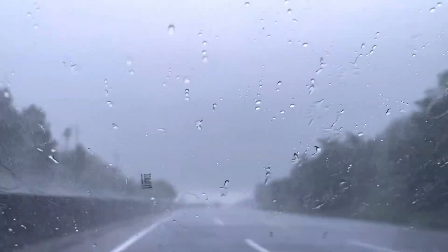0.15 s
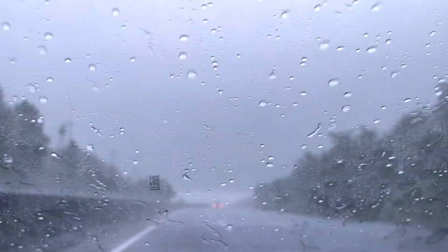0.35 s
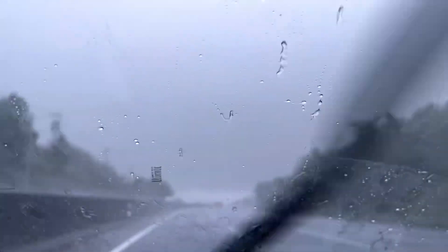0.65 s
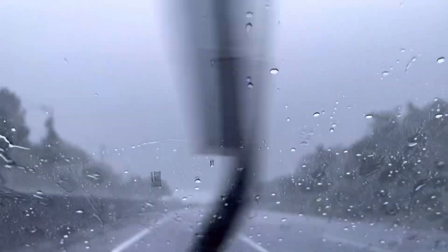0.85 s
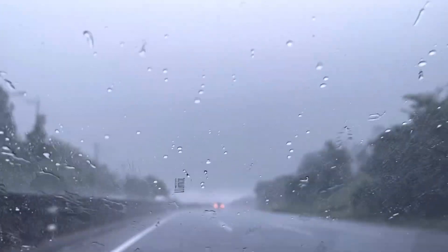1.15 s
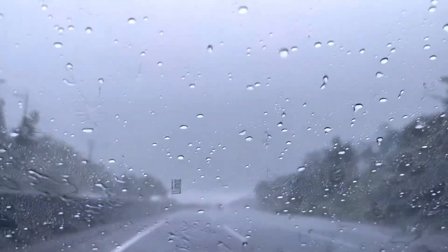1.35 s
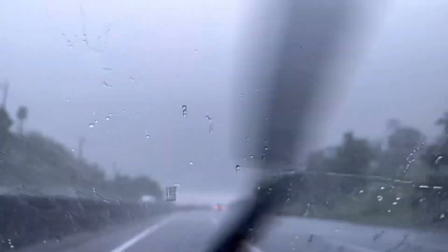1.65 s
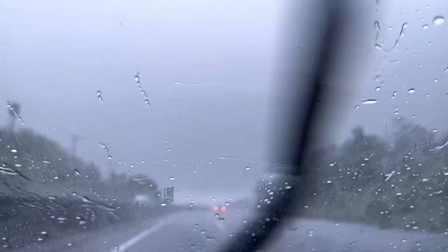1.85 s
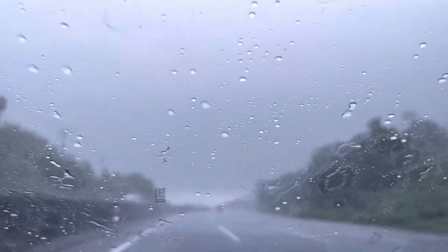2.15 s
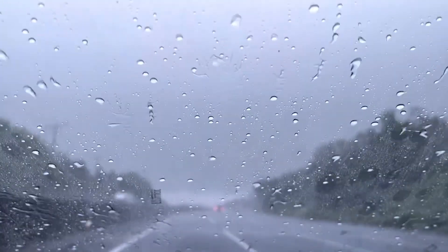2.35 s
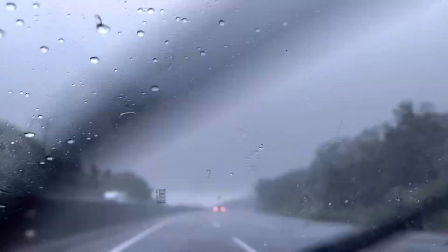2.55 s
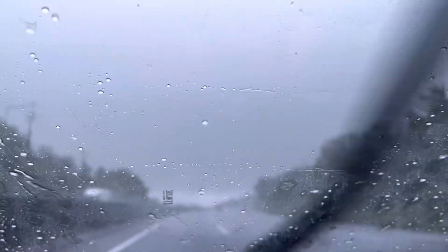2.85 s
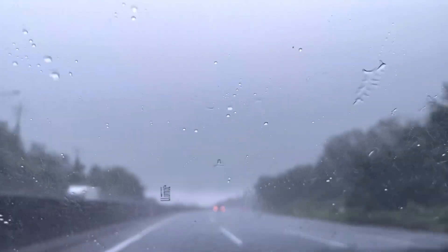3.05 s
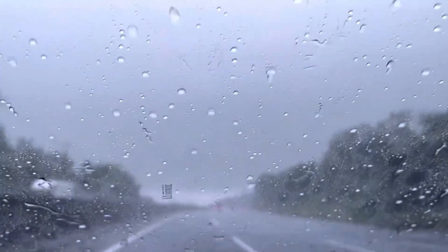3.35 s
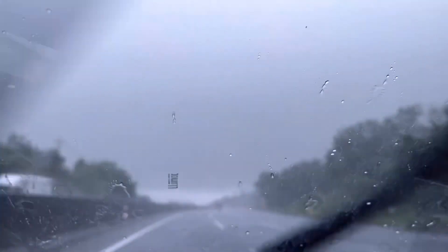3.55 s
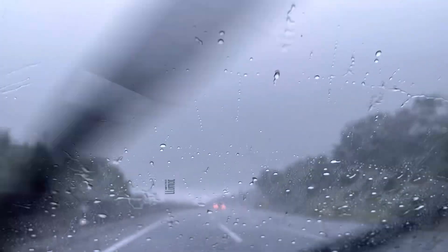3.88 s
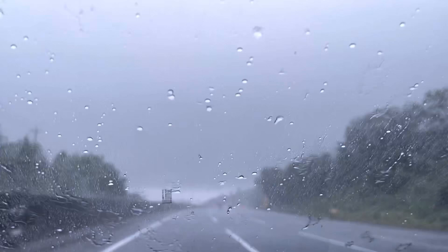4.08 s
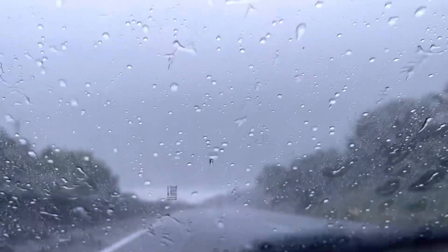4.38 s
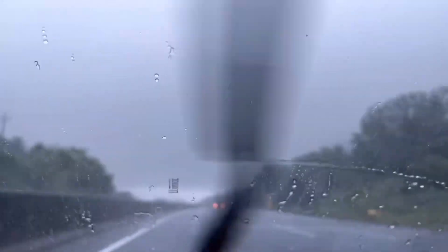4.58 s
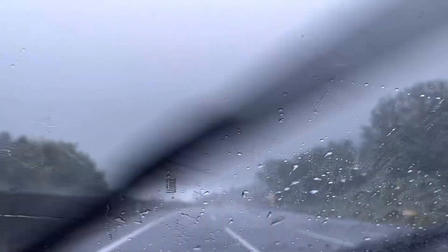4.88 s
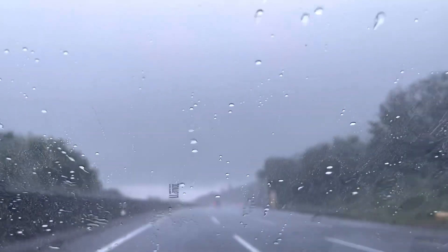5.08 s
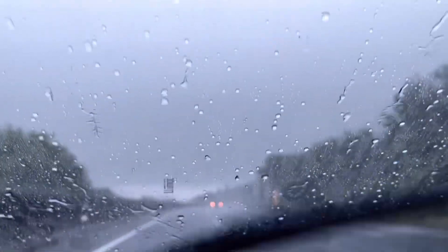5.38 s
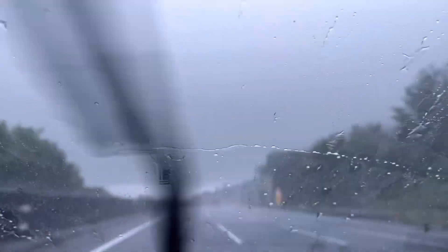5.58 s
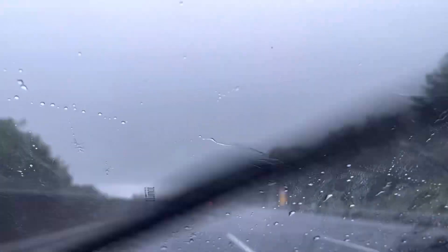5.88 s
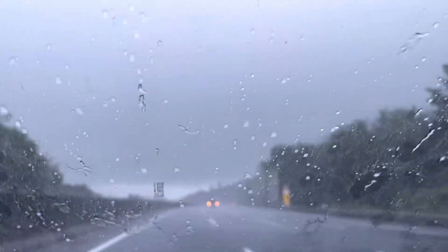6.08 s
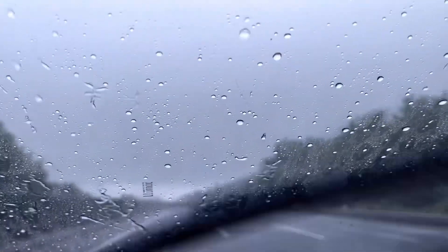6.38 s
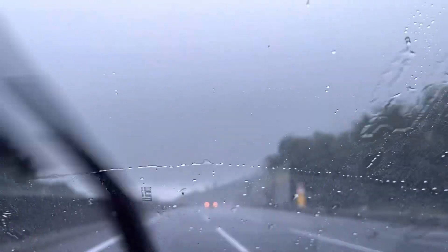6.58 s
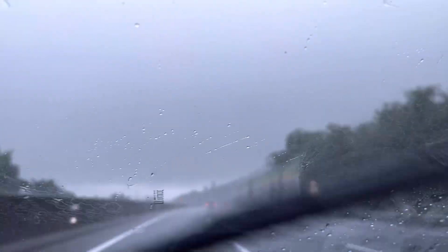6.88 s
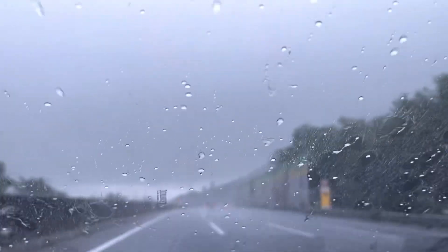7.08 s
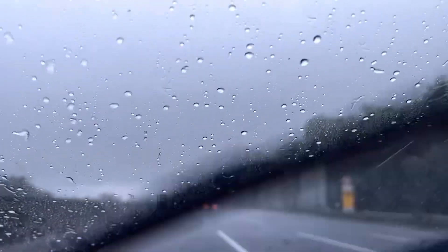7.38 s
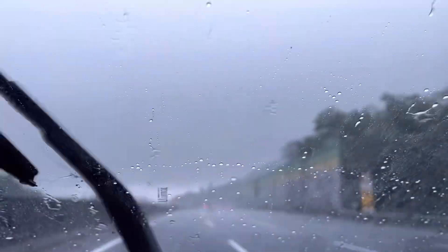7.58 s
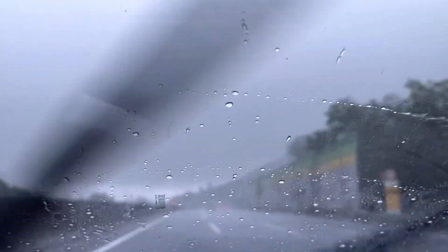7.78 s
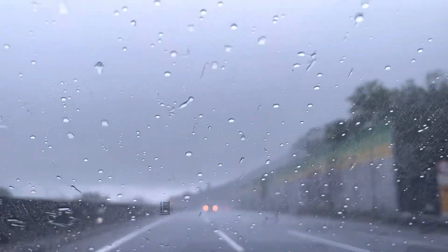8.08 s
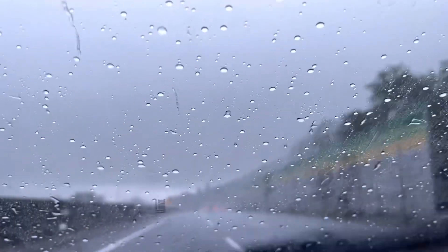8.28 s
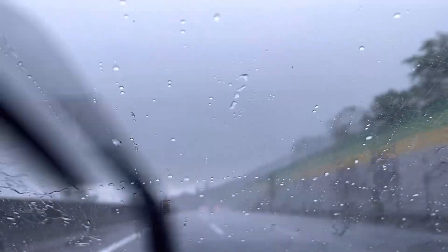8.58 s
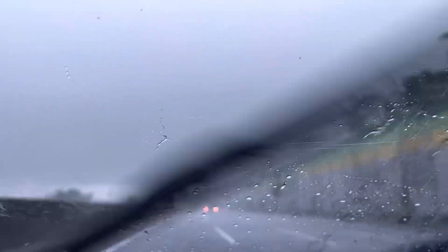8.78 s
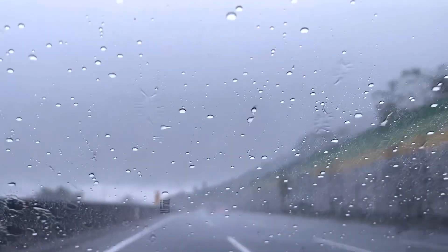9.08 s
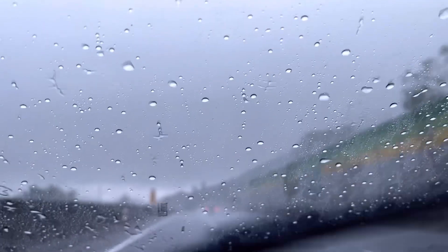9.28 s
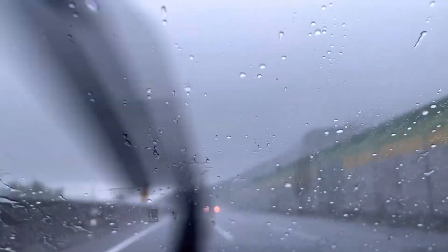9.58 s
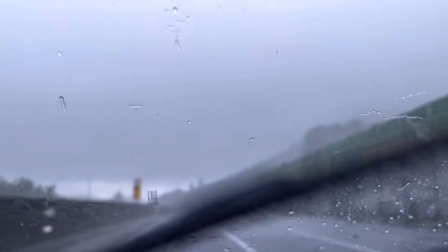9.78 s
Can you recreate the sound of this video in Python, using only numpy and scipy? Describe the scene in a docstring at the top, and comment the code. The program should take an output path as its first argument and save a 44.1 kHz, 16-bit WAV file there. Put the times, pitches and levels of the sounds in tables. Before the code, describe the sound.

For about ten seconds we are inside a car on a wet motorway in heavy rain. From the first instant dense drops crackle on the windscreen, bright and grainy, with fine hissy spray ticks and a softer, duller drumming on the lined roof. The rain swells and dips irregularly several times a second, fullest until about 6 s, then somewhat lighter. Separate fat drops slap sharply, clustered around 3.3-3.8, 5.1-5.7 and 6.2-7.1 s. Wipers reverse at about 0.8, 1.8, 2.8, 3.7, 4.7, 5.7, 6.7, 7.6, 8.6 and 9.6 s, each a short, woody low double thud, the last two firmer. Underneath, a deep road boom wavers with a faint low engine hum; a rough patch drums the floor from 0.5 to 0.9 s. Close stereo cabin microphones, short diffuse reflections, no fade at the end.

```python
"""Heavy rain on the roof and windscreen of a car on a wet motorway, heard by a two-port camera inside.
Drops are random impulses, coloured by glass or lined roof and smeared by all-pass echoes round the cabin.
The wipers knock at the end of each sweep, as decaying modes struck by two blades.
The road is shaped noise booming in the body, with a rough patch and an unsteady engine hum beneath."""
import sys
import numpy as np
from scipy import signal
from scipy.fft import rfft, irfft, next_fast_len
from scipy.io import wavfile
from scipy.ndimage import uniform_filter1d

SR = 44100
rng = np.random.default_rng(int(sys.argv[2]) if len(sys.argv) > 2 else 0)


def persist_wave(psi):
    """Save psi, clipped to +-1, as 16-bit WAV."""
    counts = np.round(np.clip(psi, -1, 1) * 32767).astype(np.int16)
    wavfile.write(sys.argv[1], SR, np.atleast_2d(counts).T)


N = 438354
SIZE = next_fast_len(N + SR // 2)  # transform length, with room for tails
HZ = np.arange(SIZE // 2 + 1) * SR / SIZE
T = np.arange(N) / SR


def rain():
    """Superposed impacts: ticks and slaps on glass, fine spray and dull roof patter follow one downpour."""
    # Strength of the downpour on the glass. Each row: time in seconds, level in dB before chance swells.
    downpour = [(0, -23.5), (.13, -30), (.27, -25), (.5, -23.5), (.6, -27.5), (.82, -24), (1.05, -29.5),
                (1.27, -23.5), (1.45, -24), (1.62, -28), (1.78, -23), (1.92, -25), (2.05, -24.5),
                (2.4, -26), (2.75, -27.5), (2.92, -29), (3.33, -23.5), (3.49, -28.5), (3.62, -26.5),
                (3.73, -28.5), (3.85, -25), (4.12, -26.5), (4.17, -27), (4.29, -28.5), (4.4, -24.5),
                (4.56, -26), (4.68, -30), (4.75, -22.5), (5.15, -27), (5.35, -24.5), (5.9, -25.5),
                (6.6, -26), (6.65, -27), (6.685, -27), (6.72, -33), (6.82, -28), (7.0, -29.5), (7.17, -26),
                (7.55, -28.5), (7.9, -30.5), (8.45, -28.5), (9.35, -29), (9.5, -26.5), (9.94, -28.5)]
    # Colour of a drop through glass. Each row: frequency in Hz, relative level in dB per Hz.
    glass_colour = [(500, -20), (1000, -11.5), (1600, -5.5), (2100, -5.5), (2700, -0.5), (4000, -2.5),
                    (5000, -7), (6000, -4.5), (8000, -12), (12000, -26.5), (16000, -47)]
    # Colour of a drop slapping the glass. Each row: frequency in Hz, relative level in dB per Hz.
    slap_colour = [(400, -18.5), (1000, 3.5), (2000, -5.5), (3000, 3.5), (3900, 4.5), (4800, -0.5),
                   (6000, -2.5), (10000, -11.5), (16000, -13.5)]
    # Colour of fine spray ticking close by. Each row: frequency in Hz, relative level in dB per Hz.
    spray_colour = [(2000, -10), (5000, 6), (8000, -1.5), (12000, 7), (16000, -19)]
    # Colour of a drop through the lined roof. Each row: frequency in Hz, relative level in dB per Hz.
    roof_colour = [(60, -17), (150, -2.5), (250, -1), (400, -2.5), (480, -3), (530, -7.5), (575, -1.5),
                   (630, -4.5), (700, -2.5), (800, -8.5), (895, -6.5), (916, -2.5), (945, -6.5),
                   (1100, -9.5), (1500, -12.5), (3000, -24.5)]
    gust_db, gusts_per_s = 0.64, 33  # quick chance swells of all the rain
    slap_db, spray_db = -10, -10.5  # relative to the glass
    roof_db, roof_follows = -27.5, 0.93  # mean level; share of the downpour's swings in dB

    db = np.interp(T, *np.transpose(downpour)) + gust_db * walk(gusts_per_s)
    roof_level = roof_db + roof_follows * (db - db.mean())
    taps = single_drops()
    flurry = walk(110)
    glass = panels(db + 0.75 * flurry, glass_colour, 900, 2.42, .0026, splits_hz=(1500, 2600, 4200))
    slaps = panels(db + slap_db, slap_colour, 90, 1.7, .001, taps, 0.39)
    spray = panels(db + spray_db + 0.88 * walk(5.2) + flurry, spray_colour, 800, 2.5, .0012)
    roof = panels(roof_level + 0.52 * flurry, roof_colour, 1100, 1.58, .006, splits_hz=(260, 480))
    return glass + slaps + spray + roof


def single_drops():
    """An impact is an impulse; the spattering after it is noise under an exponential decay."""
    # Single drops slapping the glass, from faint to fat.
    # Each row: time in seconds, tap in dB before the panel's colour.
    singles = [(.2503, -18), (.6579, -14), (0.9452, -2), (1.246, 4), (1.288, -1), (1.952, -15), (2.597, 0),
               (2.6866, 1), (3.0121, -14), (3.3484, 4), (3.5087, 0), (3.5568, -1), (3.6008, 2),
               (3.786, -0.5), (3.954, -2), (4.119, -13), (4.2133, -6), (4.3405, -8), (4.375, 5.5),
               (4.5516, -8), (4.6464, 0), (5.1176, 3), (5.2325, 1), (5.2637, 2), (5.3537, -9), (5.382, 4),
               (5.498, 5), (5.709, 6), (6.046, -25), (6.206, -5), (6.237, 1.5), (6.3132, 0.5), (6.4937, -2),
               (6.537, 5), (6.5778, 3), (6.7326, -2), (6.784, -2), (6.8863, -3), (6.992, -3), (7.1023, -2),
               (7.457, 0), (7.658, 0.5), (8.7266, -2), (9.2883, -7), (9.802, 0)]
    splat_s, splat_db = 0.014, -8  # decay time constant; level relative to the tap
    start, tap_db = np.transpose(singles)
    taps = np.zeros(N)
    taps[(start * SR).astype(int)] = undb(tap_db)
    fade = np.exp(-1 / (splat_s * SR))
    decay = signal.lfilter([np.sqrt(1 - fade ** 2)], [1, -fade], taps)
    return taps + undb(splat_db) * decay * rng.standard_normal(N)


def panels(level_db, table, per_s, spread_db, longest_s, taps=0, bounce=0.6, splits_hz=()):
    """Partial coherence: one patch of panel reaches both ports with a lag, two others one port each."""
    # The two ports. Each row: frequency in Hz, nominal phase by which the left leads in radians,
    # likeness from 0 to 1, nominal left minus right in dB.
    ports = [(0, 0, 1, 0), (120, -.05, 1, 0), (300, -.35, .98, -2), (480, -.45, .88, -3),
             (580, -.5, .85, -4), (690, -1.1, .3, -6), (850, -.3, .5, -2), (1200, -.1, .75, -.5),
             (1600, 0, .9, 0), (2100, .5, .8, 0), (2800, 2.2, .65, -1), (4500, .9, .45, -2),
             (5600, 2.8, .8, 0), (5800, 3.1, .99, 0), (6400, 3.2, .99, 0), (7500, 4.6, .65, 0),
             (8400, 6.2, .99, 0), (9600, 6.3, .99, 0), (10500, 7.6, .6, 0), (11800, 9.4, .99, 0),
             (13100, 9.45, .99, 0), (14200, 11.2, .5, 0), (14700, 12.55, .99, 0)]
    right_side = -1.008  # opposite to the left, with slightly more phase and level offset
    shade = colour(table)
    shade /= np.sqrt(np.mean(np.abs(shade) ** 2))
    hz, lead, like, pan_db = np.transpose(ports)
    lead, pan_db = np.interp(HZ, hz, lead), np.interp(HZ, hz, pan_db)
    like = np.interp(HZ, hz, np.clip(like, 0, 1))
    # Stiff and soft spots ring in different ranges, each under its own drops.
    power_above = [1] + [1 / (1 + (split / (HZ + 1)) ** 4) for split in splits_hz] + [0]

    def patch():
        """A linear panel filters its impacts: colour and echoes multiply their spectrum."""
        path = shade * echoes(longest_s, bounce)
        hits = 0
        for low, high in zip(power_above, power_above[1:]):
            impacts = drops(per_s, spread_db) * undb(level_db) + taps
            hits = hits + np.sqrt(low - high) * rfft(impacts, SIZE)
        return path * hits

    both, left, right = patch(), patch(), patch()
    sides = []
    for side, own in ((1, left), (right_side, right)):
        shared = np.sqrt(like) * both * np.exp(.5j * side * lead)
        sides.append(undb(side * pan_db / 2) * (shared + np.sqrt(1 - like) * own))
    return irfft(np.array(sides), SIZE)[:, :N]


def drops(per_s, spread_db):
    """Poisson-like arrivals: taps at random moments, a few much bigger than the rest; rms 1."""
    chance, size, sign = rng.random(N), rng.exponential(size=N), rng.standard_normal(N)
    strength = undb(spread_db * np.minimum(size, 6)) * sign
    return unit((chance < per_s / SR) * strength)


def echoes(longest_s, bounce, count=3):
    """All-pass diffusion: cabin echoes at chance lags smear a tap in time and leave its colour."""
    out = 1
    for lag in longest_s * rng.uniform(.15, 1, count):
        late = np.exp(-2j * np.pi * HZ * lag)
        out = out * (late - bounce) / (1 - bounce * late)
    return out


def wipers():
    """Impact excitation: each reversal gives a knock from the first blade and one from the second."""
    # The wipers reverse about once a second. Each row: start in seconds, first blade peak in dB,
    # second blade's delay in seconds, second blade peak in dB; peaks are before the lean to the right.
    reversals = [(.813, -14, .0145, -16.5), (1.7925, -14, .0115, -18), (2.7646, -14.5, 0.012, -17),
                 (3.7406, -13.5, 0.011, -17), (4.714, -11.5, .0105, -14), (5.687, -14, 0.0114, -12.5),
                 (6.664, -13.5, 0.0119, -15.5), (7.641, -16.5, .003, -11.5), (8.609, -10, 0.01, -14),
                 (9.5796, -9.5, 0.0028, -9)]
    first = blow(rise_s=0.0018, tilt_db=-6.5)
    second = blow(rise_s=0.0042, tilt_db=4.5)
    out = np.zeros(N + SR)
    for start, first_db, late, second_db in reversals:
        out[int(start * SR):][:len(first)] += undb(first_db) * first
        out[int((start + late) * SR):][:len(second)] += undb(second_db) * second
    return out[:N] * undb(np.array([[-.6], [.6]]))


def blow(rise_s, tilt_db):
    """Modal ringing: a rubber blade lands softly and rings the scuttle; peak 1."""
    # Modes of the scuttle. Each row: frequency in Hz, relative level in dB before the tilt,
    # time to decay by 60 dB in seconds.
    modes = [(128, 1, 0.066), (161.4, 3, 0.062), (217.6, 1.5, 0.041), (333, -4, 0.034), (485, -10.5, .025)]
    t = T[:SR // 5]
    pivot_hz = modes[2][0]
    ring = 0
    for hz, db, t60 in modes:
        # The tilt in dB per octave leans to low modes if positive, to high modes if negative.
        mode_db = db - tilt_db * np.log2(hz / pivot_hz) - 60 * t / t60
        ring = ring + undb(mode_db) * np.sin(2 * np.pi * hz * t)
    ring = (1 - np.exp(-t / rise_s)) ** 3 * ring
    return -ring / np.abs(ring).max()


def road():
    """Structure-borne noise: wet tarmac shakes the body, over an engine hum that wavers in pitch and level."""
    # Level of the boom. Each row: time in seconds, level in dB.
    boom_level = [(0, -24.5), (.7, -24.5), (1.0, -27), (2.05, -24.5), (2.2, -24), (2.7, -24.5), (3.3, -22),
                  (3.55, -24.5), (5.7, -24.5), (6.8, -27), (7.15, -22), (7.36, -26.5), (8.0, -23.5),
                  (8.35, -27), (8.6, -22), (8.9, -24), (9.94, -24.5)]
    # Body and cabin boom. Each row: frequency in Hz, relative level in dB per Hz.
    boom_colour = [(15, -32), (25, -16), (32, -10), (38, -2.5), (46, 1), (57, -2.5), (68, 1.5), (79, -2.5),
                   (91, 0.5), (101, -1), (118, -0.5), (134, -1), (148, -10.5), (200, -16), (300, -52)]
    engine_hz, engine_db = 90.5, -34  # means, about which pitch and level waver
    db = np.interp(T, *np.transpose(boom_level))
    boom = irfft(rfft(rng.standard_normal(N), SIZE) * colour(boom_colour), SIZE)[:N]
    pitch_hz = engine_hz * (1 + 0.00795 * walk(4))
    hum = np.sqrt(2) * np.sin(2 * np.pi * np.cumsum(pitch_hz) / SR)
    return rough_patch() + unit(boom) * undb(db) + hum * undb(engine_db + 1.2 * walk(3.9))


def rough_patch():
    """Band-limited excitation: a rough patch of road drums the floor as a Gaussian band of noise."""
    start_s, length_s, centre_hz, width_hz, level_db = 0.47, 0.41, 105, 59, -21
    on = np.interp(T - start_s, [0, .03, length_s - .04, length_s], [0, 1, 1, 0])
    band = np.exp(-((HZ - centre_hz) / width_hz) ** 2 * 2)
    floor = irfft(rfft(rng.standard_normal(N), SIZE) * band, SIZE)[:N]
    return on * unit(floor) * undb(level_db)


def undb(db):
    """Logarithmic level: 20 dB is a tenfold amplitude gain."""
    return 10 ** (np.asarray(db) / 20)


def unit(x):
    """Mean power normalisation: scale to rms 1."""
    return x / np.sqrt(np.mean(x ** 2))


def colour(table):
    """Minimum phase: a causal response through (Hz, dB) points, by folding the cepstrum."""
    hz, db = np.transpose(table)
    gain = undb(np.interp(np.log(HZ + 1), np.log(hz), db))
    cepstrum = irfft(np.log(gain), SIZE)
    cepstrum[1:SIZE // 2] *= 2
    cepstrum[SIZE // 2 + 1:] = 0
    return np.exp(rfft(cepstrum))


def walk(rate):
    """Smoothed random modulation: levels held 1 / rate seconds and slewed twice; rms 1."""
    k = int(SR / rate)
    held = rng.standard_normal(N)[np.arange(N) // k]
    return unit(uniform_filter1d(uniform_filter1d(held, k), k))


def scene():
    """Linear superposition of rain, wipers and road."""
    return rain() + wipers() + road()


def record(dry):
    """Band limiting: the camera cuts the top with a steep elliptic low-pass."""
    top_hz = 15780
    return signal.sosfilt(signal.ellip(14, .3, 80, top_hz, fs=SR, output="sos"), dry)


dry = scene()
out = record(dry)
persist_wave(out)
```